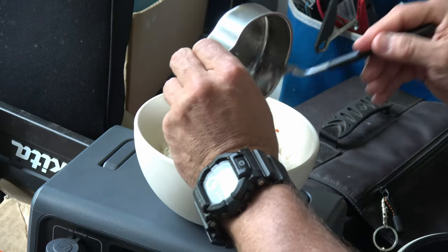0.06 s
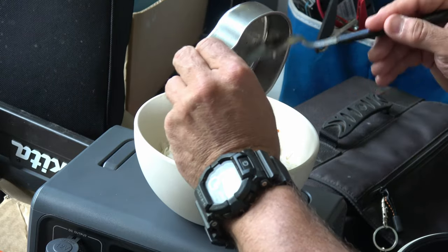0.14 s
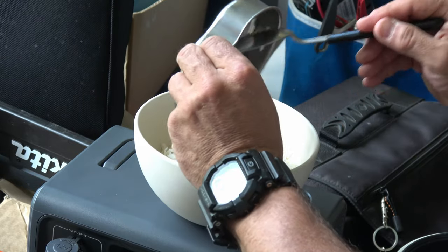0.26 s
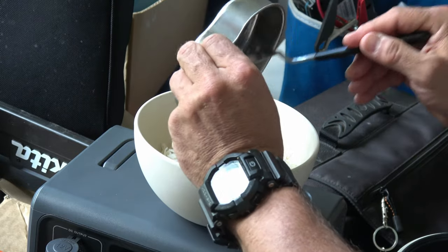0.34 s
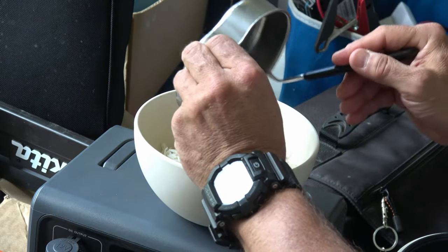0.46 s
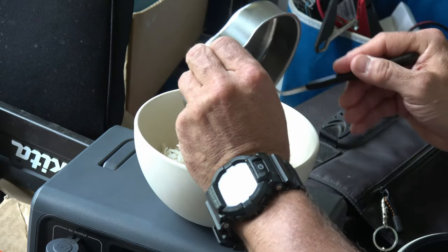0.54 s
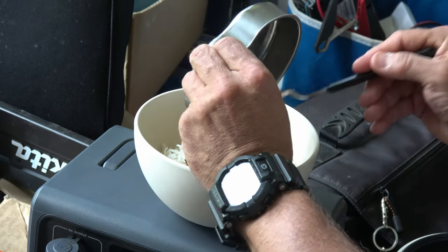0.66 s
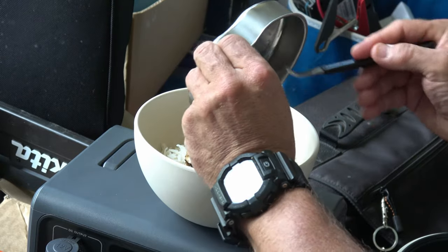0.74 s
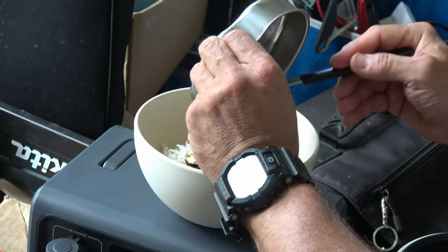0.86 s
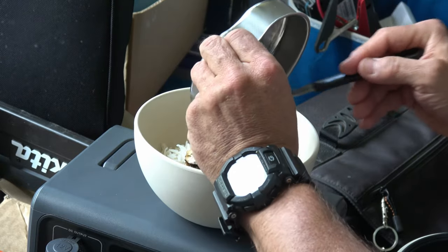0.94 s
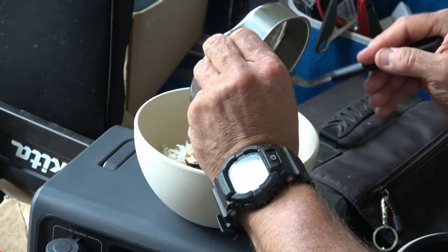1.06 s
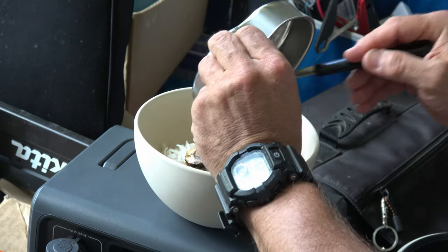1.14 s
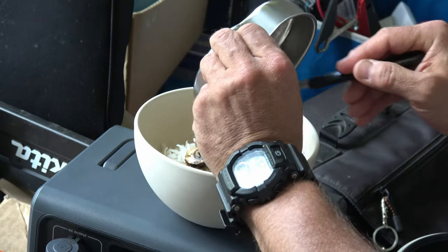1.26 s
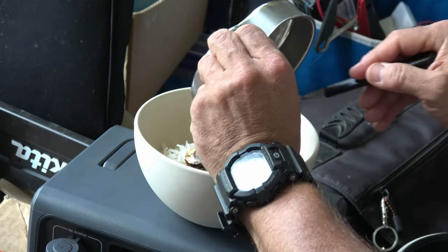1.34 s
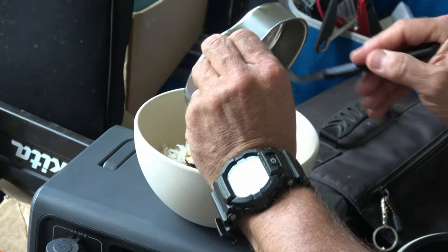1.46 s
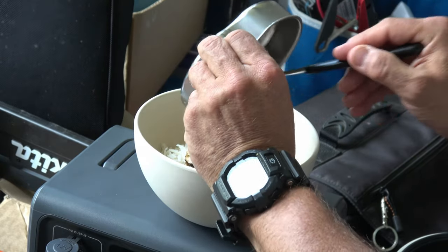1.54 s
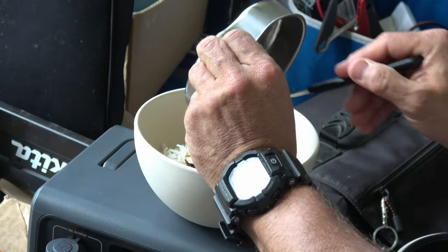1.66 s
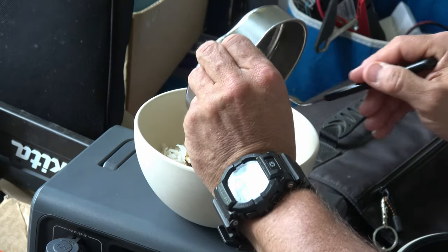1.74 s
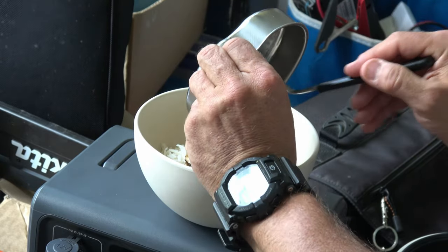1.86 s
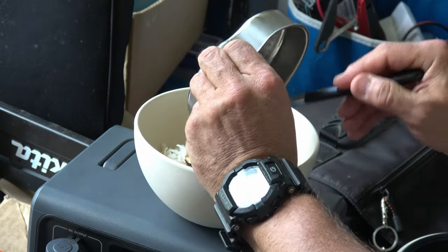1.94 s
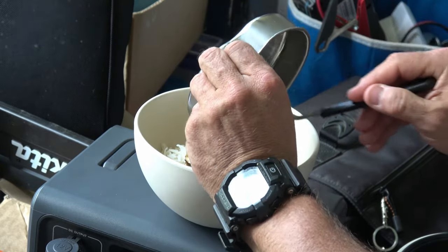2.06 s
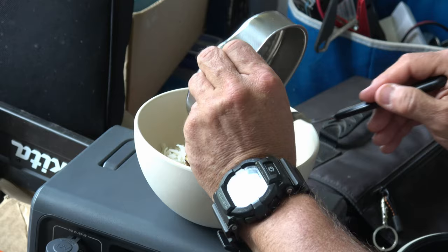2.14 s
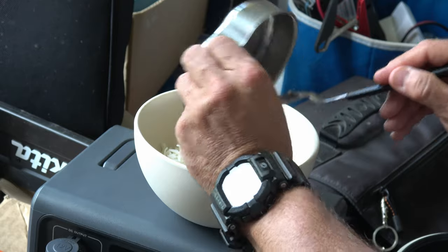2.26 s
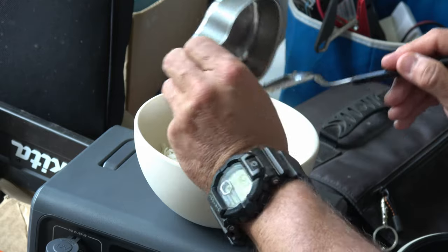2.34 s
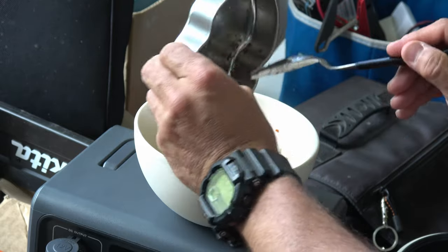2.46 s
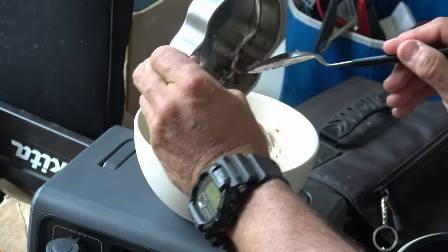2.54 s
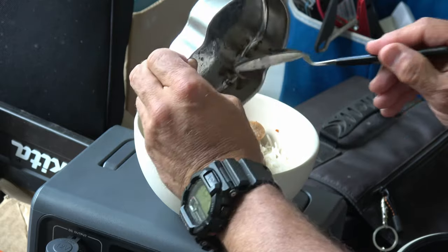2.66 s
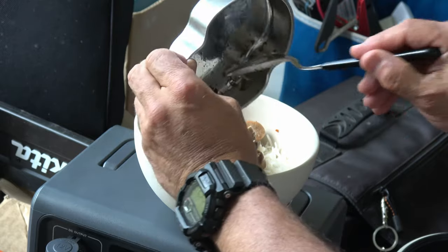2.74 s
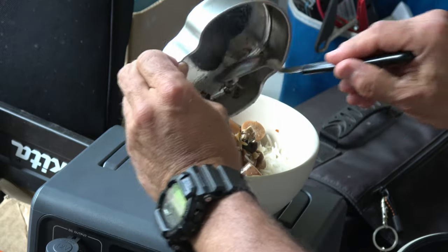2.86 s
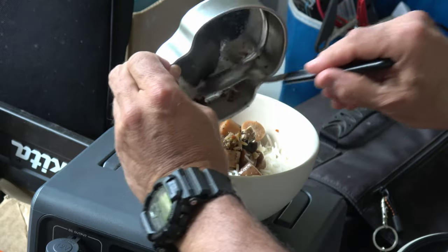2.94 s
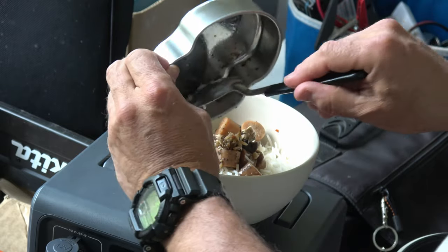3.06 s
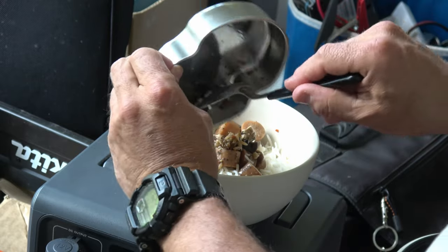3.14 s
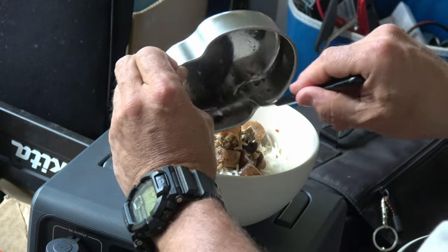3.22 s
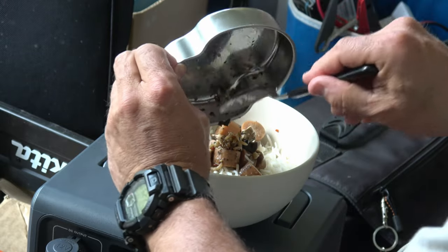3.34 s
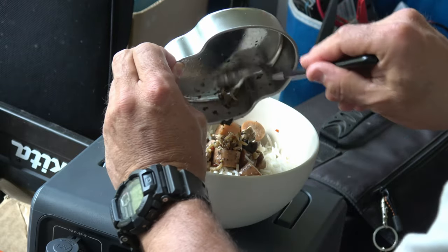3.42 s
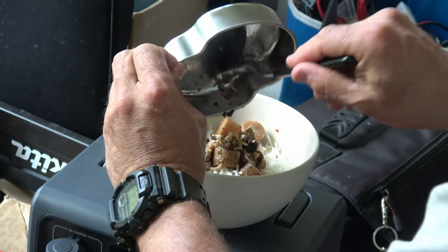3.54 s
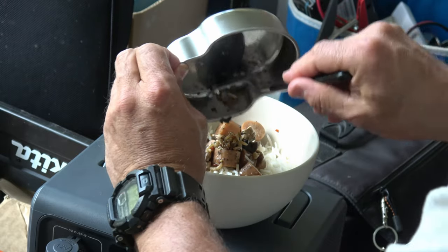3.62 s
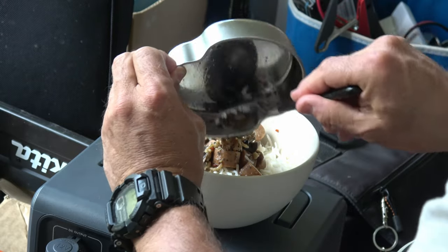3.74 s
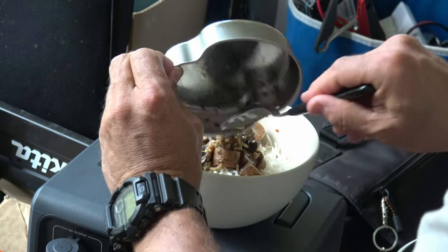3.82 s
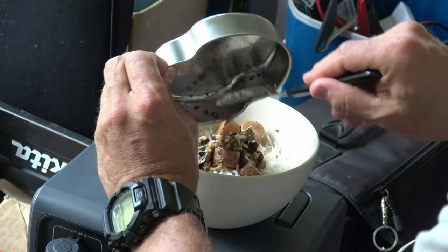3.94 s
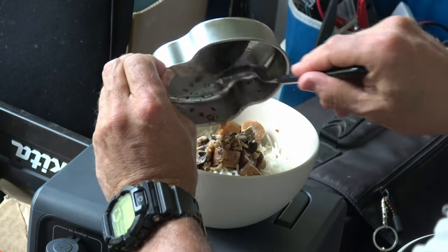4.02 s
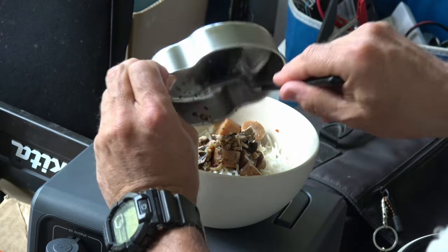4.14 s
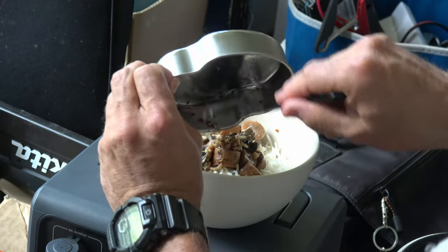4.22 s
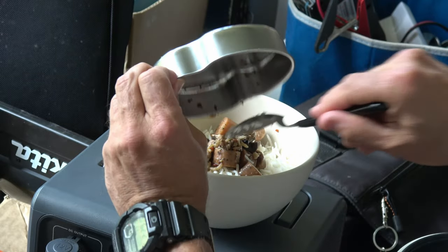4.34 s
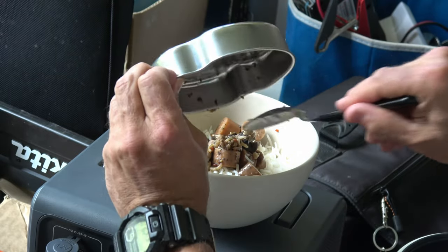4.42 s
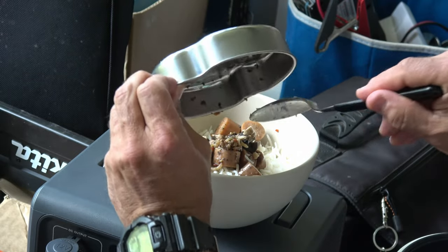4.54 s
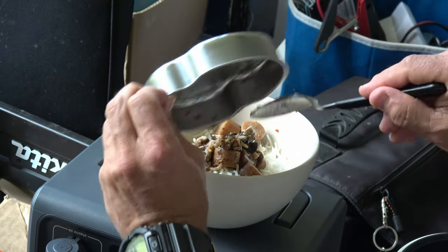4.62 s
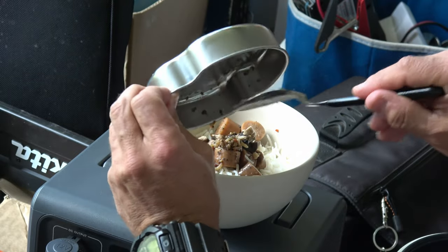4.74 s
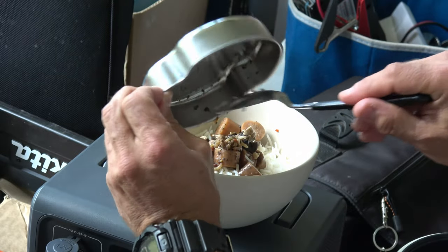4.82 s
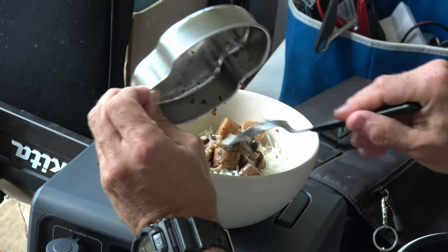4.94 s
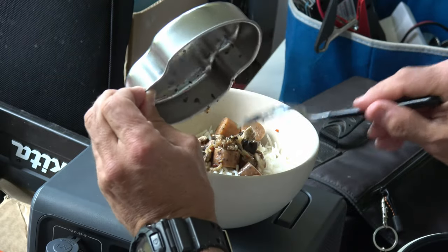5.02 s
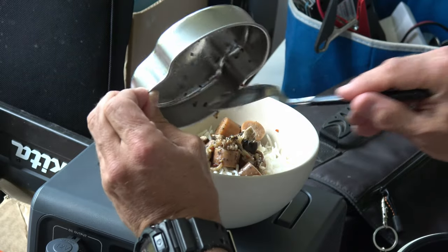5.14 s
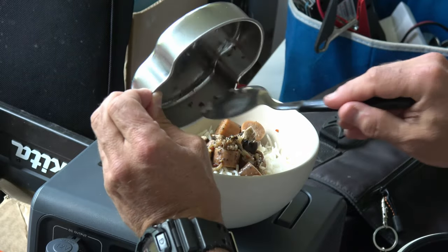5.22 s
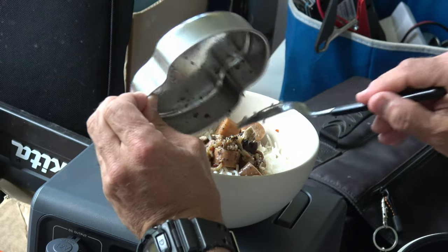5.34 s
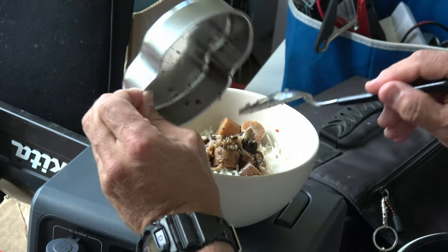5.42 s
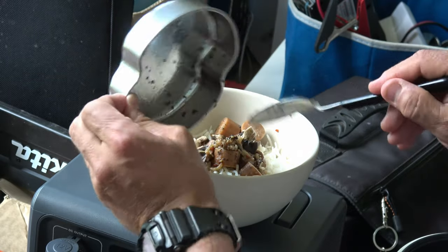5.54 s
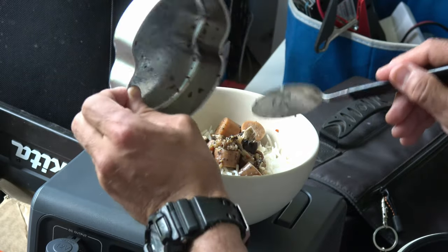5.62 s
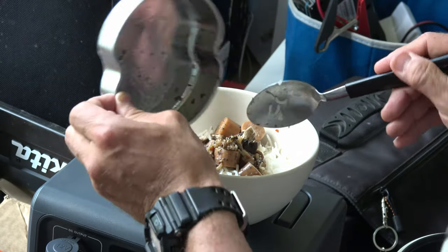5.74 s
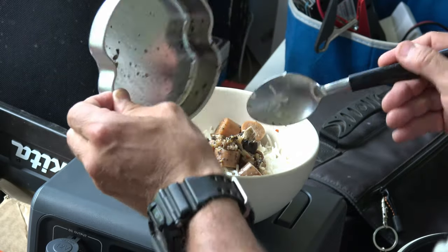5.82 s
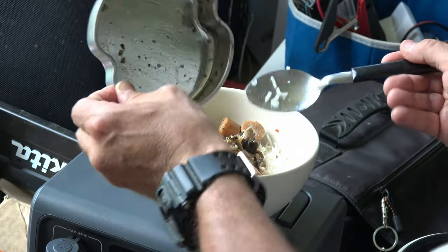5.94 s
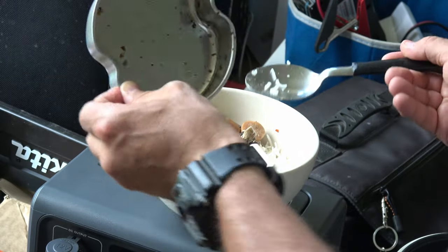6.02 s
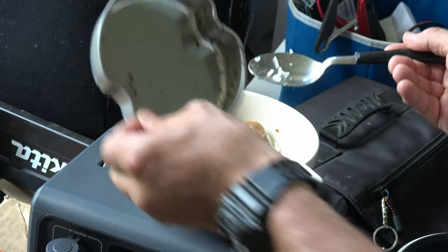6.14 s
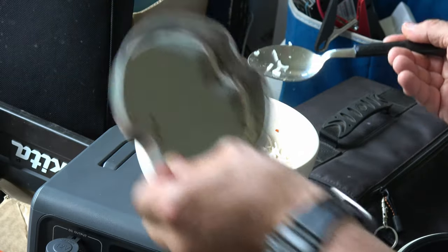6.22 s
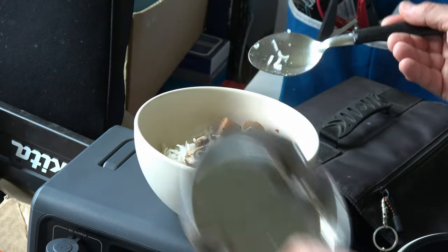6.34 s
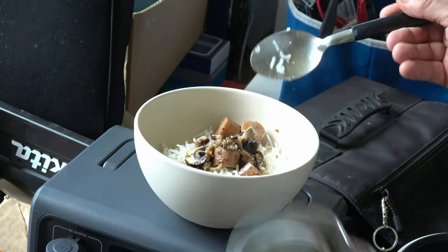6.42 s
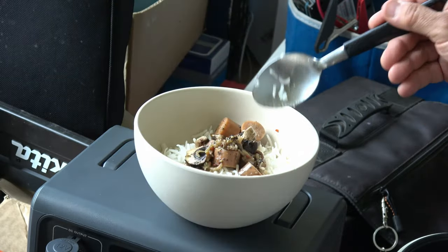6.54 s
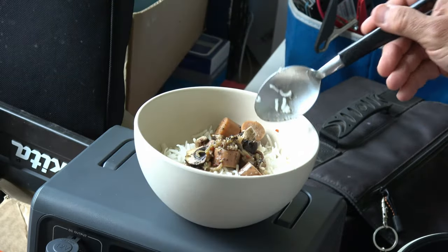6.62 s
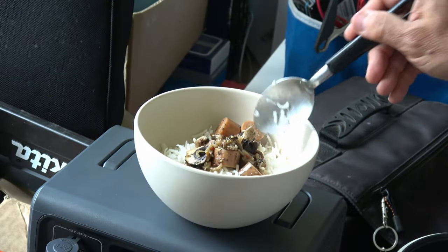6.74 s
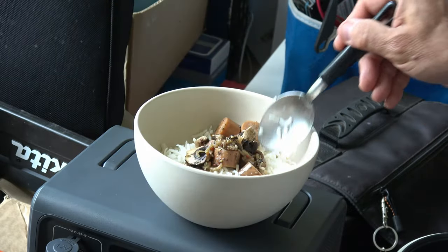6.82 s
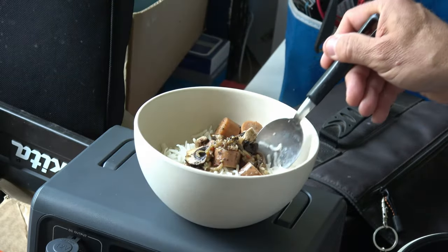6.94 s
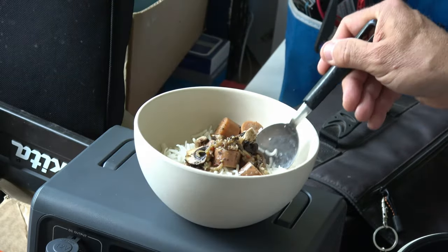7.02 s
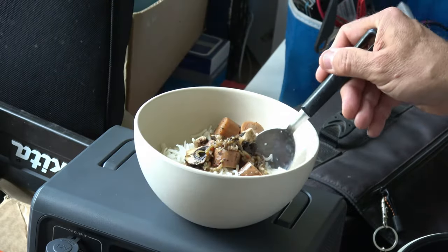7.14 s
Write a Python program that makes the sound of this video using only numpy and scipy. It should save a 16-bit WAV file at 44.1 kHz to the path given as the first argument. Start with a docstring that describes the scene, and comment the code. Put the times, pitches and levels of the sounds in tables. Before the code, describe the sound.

A spoon taps and scrapes a small steel tray over a ceramic bowl, with short metallic rings above a faint machine hum.

```python
"""A small room: close by, a spoon taps and scrapes clean a small steel tray held over a ceramic bowl.
Each contact rings the tray's modes by where it lands, and the bowl rings more slowly under it.
Scrapes drive the same modes with slip noise and add a rasp that rises with the spoon's speed.
The room answers briefly; behind it machines hum and throb faintly and a fan hisses."""
import sys
import numpy as np
from scipy import signal
from scipy.fft import rfft, irfft
from scipy.io import wavfile
from scipy.ndimage import uniform_filter1d

SR = 44100
rng = np.random.default_rng(int(sys.argv[2]) if len(sys.argv) > 2 else 0)


def put_to_file(sound):
    """Save the sound as 16-bit audio at rate SR, in the file named by the first command-line argument."""
    columns = np.atleast_2d(sound).T  # one column per channel
    safe = np.clip(columns, -1, 1)
    whole_steps = np.round(safe * 32767)
    wavfile.write(sys.argv[1], SR, whole_steps.astype(np.int16))


N = 316197
DULLING = 0.28  # share of the hardness tilt felt by strong modes and bowl


def amp(db):
    return 10 ** (np.asarray(db) / 20)


def unit_rms(x):
    return x / np.sqrt(np.mean(x ** 2) + 1e-20)


def curve_at(points, hz):
    f, value = np.transpose(points)
    return np.interp(np.log(hz + 1), np.log(f + 1), value)


def add(mix, start_s, sound):
    """Mix in a sound, panned to where the tray has drifted."""
    # tray drift: t/s, left minus right/dB
    sway = [(0, 1.6), (2.2, 0.4), (4.2, 0.05), (6.5, 1.4)]
    pan_db = np.interp(start_s, *np.transpose(sway))
    part = mix[:, round(start_s * SR):][:, :len(sound)]
    part += amp([[pan_db / 2], [-pan_db / 2]]) * sound[:part.shape[1]]


def damped_sines(hz, t60_s, size):
    t = np.arange(size) / SR
    return np.exp(-np.log(1000) * t / t60_s[:, None]) * np.sin(2 * np.pi * hz[:, None] * t)


def resonate(x, hz, width_hz):
    """Moving resonance: shift hz down to zero, smooth twice, shift back."""
    turn = np.exp(2j * np.pi * np.cumsum(hz) / SR)
    pole = np.exp(-np.pi * width_hz / SR)
    smoother = [1 - pole], [1, -pole]
    return 2 * (turn * signal.lfilter(*smoother, signal.lfilter(*smoother, x / turn))).real


def contact(main, main_db, second, second_db, *rest, spill_db=-24):
    """A contact stirs two places and spills into the others: five levels/dB, then rest."""
    # contact places: grip, rim, wall, floor, spoon's edge
    places = ["grip", "rim", "wall", "floor", "edge"]
    touched = {main: main_db, second: second_db}
    return [touched.get(name, main_db + spill_db) for name in places] + list(rest)


def tilt_db(contacts, hz):
    """Softer contacts lose treble above 2 kHz."""
    hardness = contacts[:, 7:8]
    return hardness * np.log2(np.maximum(hz, 2000) / 2000)


def tray_ring(contacts, weak_count=540):
    """Steel ring per contact: strong modes set by place, a dense sheet of weak ones by chance."""
    # strong modes: f/Hz
    mode_hz = [535, 895, 1373, 1405, 1440, 1535, 1760, 1990, 2045, 2143, 2557, 2725, 2775, 3030, 3456, 3805,
               4048, 4118, 4340, 4630, 4963, 5535, 5950, 6277, 6498, 6611, 7050, 7165, 7640, 8410]
    # same modes: level/dB at grip, rim, wall, floor, spoon's edge; t60/s
    modes = [(-2, -43, -36, -36, -39, 0.13), (-18.5, -28, -20, -10, -20.5, 0.14),
             (-17, -24, 2, -6.5, -20, 0.21), (-26.5, -4, -7, -33.5, -18.5, 0.14),
             (-19, -7, -26, -34, -18, 0.1), (-30, -9, -22.5, -42.5, -12.5, 0.13),
             (-12.5, -25, -22.5, -30.5, -12.5, 0.12), (-35.5, -23.5, 0.5, 4, -29.5, 0.099),
             (-23, -9.5, -18, -13, -35, 0.15), (-23, -25, -32.5, -2, -27, 0.097),
             (-23.5, -33, -17.5, -31.5, 1.5, 0.22), (-32.5, -31, -12.5, -3.5, -4, 0.08),
             (-25, -11.5, -27, -16.5, -11, 0.11), (-21.5, -22.5, -32.5, -10, -12.5, 0.34),
             (-38.5, -29.5, -34, -35, -9, 0.089), (-35.5, -22, -28, -5.5, -9.5, 0.22),
             (-29.5, -17.5, -32, -21, 3, 0.15), (-41, -21.5, -19.5, -29, -13, 0.15),
             (-32, -33.5, -37, -30, -6.5, 0.045), (-39, -29, -26.5, -23.5, -8.5, 0.088),
             (-34.5, -21, -25.5, -21.5, -9, 0.53), (-30, -29.5, -34.5, -34.5, -3, 0.38),
             (-34, -7, -24.5, -16.5, 6, 0.11), (-23, -33, -36, -24, -7, 0.16),
             (-36.5, -34, -42.5, -36.5, 2.5, 0.29), (-27.5, -35.5, -37.5, -26, -6, 0.12),
             (-34.5, -20, -32.5, -13, -7, 0.36), (-32.5, -28, -11.5, -24, -3, 0.16),
             (-36, -21, -34.5, -13, -2.5, 0.2), (-34, -27.5, -18.5, -13.5, -7.5, 0.14)]
    # weak modes of the thin steel: f/Hz, level/dB
    sheet_db = [(300, -26), (700, -9.5), (1200, -6.5), (2000, -2), (3500, -3), (6000, -4.5), (10000, -1),
                (14000, -0.5), (16500, -25)]
    # their decay: f/Hz, t60/s
    sheet_t60 = [(400, 0.17), (2000, 0.077), (6000, 0.17), (15000, 0.047)]
    modes, mode_hz = np.array(modes), np.array(mode_hz)
    strong = amp(contacts[:, :5]) @ amp(modes[:, :5]).T
    scatter_db = 4 * rng.standard_normal(strong.shape)
    strong *= amp(DULLING * tilt_db(contacts, mode_hz) + scatter_db)
    for favoured_hz, db in contacts[:, -4:].T.reshape(2, 2, -1):  # two modes set by the exact spot
        nearest = abs(favoured_hz[:, None] - mode_hz).argmin(1)
        strong[np.arange(len(contacts)), nearest] = amp(db)
    strong *= rng.choice([-1., 1.], strong.shape)
    steel = strong @ damped_sines(mode_hz, modes[:, 5], SR // 2)
    weak_hz = np.linspace(300, 16500, weak_count) + rng.uniform(-10.5, 10, weak_count)
    weak_db = contacts[:, 6:7] + curve_at(sheet_db, weak_hz) + tilt_db(contacts, weak_hz)
    weak = amp(weak_db) * rng.standard_normal(weak_db.shape)
    steel[:, :SR // 4] += weak @ damped_sines(weak_hz, curve_at(sheet_t60, weak_hz), SR // 4)
    return steel


def bowl_ring(contacts):
    """Slow ceramic ring per contact."""
    # bowl modes: f/Hz, t60/s, level/dB
    modes = [(745, .4, -24), (1071, .9, -19), (1152, .45, 0), (2409, .33, -16), (3219, .6, -26),
             (4544, .34, -24), (5163, .55, -20)]
    hz, t60_s, db = np.transpose(modes)
    gains = amp(contacts[:, 5:6] + db + DULLING * tilt_db(contacts, hz))
    return gains @ damped_sines(hz, t60_s, SR // 2)


def taps(chatter_db=-20.5, chatter_s=0.021, grip_db_per_s=32.5):
    """A click, then chatter as the spoon settles; hand and spoon damp the steel. Gives tray, bowl."""
    # spoon blows: t/s, main place, level/dB, second place, level/dB, bowl/dB, weak modes/dB,
    # hardness/(dB/oct), two favoured modes (f/Hz, level/dB)
    blows = [(0, "floor", -47.5, "wall", -40.5, -61.5, -54.5, 0.1, 1373, -43.5, 2725, -37.5),
             (.2185, "edge", -42.5, "rim", -37.5, -46, -40.5, -3, 1373, -58, 7050, -32.5),
             (.427, "rim", -23, "wall", -22.5, -35.5, -37.5, -3, 1440, -14, 4118, -26.5),
             (0.612, "floor", -38.5, "wall", -69, -74, -48, -6, 1990, -34, 2725, -26.5),
             (0.8305, "edge", -54, "rim", -26.5, -36.5, -38, -3.5, 1990, -28, 5950, -24),
             (0.9145, "wall", -27, "rim", -49, -32.5, -35.5, -8.5, 1373, -26, 2557, -39),
             (1.055, "rim", -27, "wall", -47, -37.5, -32.5, -5, 1373, -25.5, 2775, -20),
             (1.2461, "wall", -29.5, "grip", -36, -45, -43, -4, 1990, -24.5, 8410, -33.5),
             (1.593, "edge", -68, "grip", -61, -52, -57.5, -4, 1990, -54, 4963, -54),
             (1.6869, "floor", -24, "wall", -32, -57, -39, -5.5, 1990, -23, 2557, -35),
             (1.762, "edge", -41, "wall", -41, -36.5, -54, -2, 2725, -35, 5950, -26),
             (2.0207, "floor", -32.5, "wall", -46, -38.5, -44.5, -2, 1373, -34.5, 8410, -35),
             (2.483, "grip", -65, "floor", -75, -59.5, -81, -24, 3030, -65, 1990, -69),
             (2.9966, "rim", -29, "grip", -37, -41.5, -44.5, -1.2, 1760, -32.5, 4048, -35),
             (3.083, "floor", -47, "grip", -45, -34.5, -38.5, -5.5, 1990, -29, 5950, -30),
             (3.5208, "grip", -39, "floor", -59, -41.5, -51.5, -20.5, 1373, -44, 2557, -50),
             (3.6146, "rim", -20, "floor", -24.5, -19.5, -39, -3.5, 1990, -16.5, 1440, -16.5),
             (4.1549, "rim", -15.5, "wall", -27, -24.5, -41.5, -1.7, 1990, -16, 4048, -25),
             (5.2297, "edge", -28, "wall", -34, -26.5, -34.5, -0.8, 2725, -27, 4340, -16),
             (5.67, "grip", -53, "wall", -71, -58, -74, -7, 535, -49, 1990, -59),
             (6.034, "grip", -60, "wall", -77, -71, -80, -6, 535, -51.5, 895, -71.5),
             (6.442, "grip", -60, "floor", -83, -67, -75.5, -4.5, 535, -70, 1990, -70.5)]
    contacts = np.array([contact(*row[1:]) for row in blows])
    tray, bowl = np.zeros((2, N)), np.zeros((2, N))
    t = np.arange(2500) / SR
    for (start_s, *_), steel, ceramic in zip(blows, tray_ring(contacts), bowl_ring(contacts)):
        chatter = rng.standard_normal(len(t)) * (rng.random(len(t)) < .1)
        force = amp(chatter_db) * chatter * np.exp(-t / chatter_s)
        force[0] = 1
        damping = amp(-grip_db_per_s * np.arange(len(steel)) / SR)
        add(tray, start_s, signal.fftconvolve(force, steel * damping))
        add(bowl, start_s, ceramic)  # one clean ceramic ring starts with each tap
    return tray, bowl


def machine_hum(crest_s=3.62, waver_db=0.4, rumble_db=-77):
    """Wavering lines, in phase at crest_s, over a low rumble; the close pair beats."""
    # hum lines: f/Hz, level/dB
    lines = [(29.82, -70), (59.6, -67), (67.56, -64), (87.21, -61.5), (89.48, -63.5), (119.27, -82.5)]
    t = np.arange(N) / SR - crest_s
    out = np.zeros(N)
    for hz, db in lines:
        waver = unit_rms(sum(np.sin(2 * np.pi * (f * t + rng.random())) for f in (.2, .45, .9)))
        out += np.sqrt(2) * amp(db + waver_db * waver) * np.cos(2 * np.pi * hz * t)
    band = signal.butter(2, [20, 90], "band", fs=SR, output="sos")
    rumble = signal.sosfilt(band, rng.standard_normal(N))
    return out + amp(rumble_db) * unit_rms(rumble)


def fan_noise(level_db=-58, patch_db=1.7):
    """Fan and microphone noise with faint drifting patches in its spectrum."""
    # noise spectrum: f/Hz, relative density/dB
    spectrum = [(59, -32), (100, 3), (119, -11), (186, -12.5), (255, -16), (303, -12), (359, -17),
                (527, -13.5), (612, -15.5), (879, -18), (1180, -7.5), (1290, -24), (12100, -33.5),
                (16300, -39)]
    # stereo likeness: f/Hz, coherence
    coherence = [(60, 0.74), (180, 0.77), (550, 0.56), (1650, 0.98), (4970, 0.61), (15000, 0.91)]
    frames, hz = N // 256 + 5, np.fft.rfftfreq(1024, 1 / SR)
    left_re, left_im, side_re, side_im, patches = rng.standard_normal((frames, 513, 5)).T
    patches = unit_rms(uniform_filter1d(uniform_filter1d(patches, 8, 0), 14, 1))
    shared = curve_at(coherence, hz)[:, None]
    left = left_re + 1j * left_im
    right = shared * left + np.sqrt(1 - shared ** 2) * (side_re + 1j * side_im)
    spectra = np.array([left, right]) * amp(curve_at(spectrum, hz)[:, None] + patch_db * patches)
    noise = signal.istft(spectra, nperseg=1024, noverlap=768)[1][:, :N]
    return amp(level_db) * unit_rms(noise)


def thud(db, hz, t60_s, attack_s=0.0018):
    """One low damped mode with a soft start."""
    t = np.arange(SR // 3) / SR
    return amp(db - 60 * t / t60_s) * np.sin(2 * np.pi * hz * t) * (1 - np.exp(-t / attack_s))


def machine_throb(period_s=.3012, level_db=-60, hz=294):
    """Regular beat of a distant machine, uneven in strength."""
    out = np.zeros((2, N))
    for start_s in np.arange(.02, N / SR, period_s):
        db = level_db + 4.8 * rng.standard_normal()
        add(out, start_s, thud(db, hz * rng.uniform(1.0, 1.04), t60_s=.2))
    return out


def scrapes(lift_db_per_s=699.5, lift_s=0.028, grit_per_s=2500, screech_hz=7480):
    """Slips and grit drive the modes, a rasp and an edge screech; the spoon speeds up, then lifts."""
    # spoon strokes: t/s, length/s, top level/dB, swell/dB, main place, second place;
    # relative to main place: second/dB, bowl/dB, weak modes/dB; hardness/(dB/oct),
    # two favoured modes (f/Hz, level/dB), rasp top/Hz, rasp/dB, screech/dB
    strokes = [(0.294, 0.11, -43, 8, "rim", "edge", -15, -18, -16, 1.2, 4048, -7, 5535, 0, 5200, -3, -5),
               (.47, 0.057, -33.5, -1, "wall", "rim", -9, 18, -17, -3, 1535, 12, 3030, 3, 3050, -1.5, -23),
               (0.626, 0.0533, -31, 27, "floor", "wall", -22, -6, -21, 2, 1990, 3.5, 8410, 1, 4170, -9.5, -10.5),
               (0.937, 0.12, -26, 8.5, "floor", "wall", -13, -9, -17, 2, 1990, 0, 7165, 3, 7860, -14, -1.5),
               (1.283, 0.12, -25.5, 13, "floor", "wall", -3.5, 2, -15, 0.8, 2143, 5, 4048, 2.5, 4250, -6, -2.5),
               (1.74, 0.045, -31, 16, "floor", "edge", 1, 25, -5, -.9, 5950, 3, 4630, 1.5, 5200, -4, -1),
               (2.05, 0.085, -25, 9, "floor", "wall", -16.5, -21, -11.5, -3, 1990, 1.5, 3805, 3.5, 3800, -8, -5.5),
               (3.79, 0.084, -28, 17.5, "edge", "floor", -0.5, 7.5, -15, -5.5, 4630, 0, 4963, 3.5, 3700, -1.5, -10.5),
               (4.239, 0.083, -25, 14, "rim", "floor", -3.5, -8.5, -9, -4.5, 1405, 3, 1990, 0, 3850, -5, -4),
               (5.233, 0.064, -31.5, -1.2, "edge", "floor", -2, -30.5, 1, -6.5, 6498, 4, 6277, 6, 4400, -4, -0.5)]
    contacts = np.array([contact(row[4], 0, *row[5:-3]) for row in strokes])
    out, size = np.zeros((2, N)), SR // 4
    t = np.arange(size) / SR
    lowpass = signal.butter(2, 3000, fs=SR, output="sos")
    for row, steel, ceramic in zip(strokes, tray_ring(contacts), bowl_ring(contacts)):
        start_s, length_s, top_db, swell_db = row[:4]
        rasp_hz, rasp_db, screech_db = row[-3:]
        speed = np.minimum(t / length_s, 1)
        envelope_db = -swell_db * (1 - speed) ** 2.6 - lift_db_per_s * np.maximum(t - length_s, 0)
        level = amp(top_db + envelope_db) * (t < length_s + lift_s)
        grit = amp(7.8 * np.minimum(rng.exponential(1, size), 3.2))
        grit *= rng.random(size) < grit_per_s / SR
        slips = unit_rms((1 + grit) * rng.standard_normal(size))
        blunt = signal.sosfilt(lowpass, slips)
        force = blunt + (slips - blunt) * amp(0.72 * envelope_db)  # louder is sharper
        spoon_damping = np.exp(-np.arange(len(steel)) / SR / 0.046)
        ring = steel * spoon_damping + 0.2 * ceramic
        rasp = unit_rms(resonate(slips, rasp_hz * (0.65 + 0.35 * speed), width_hz=900))
        screech = unit_rms(resonate(slips, np.full(size, screech_hz), width_hz=2400))
        add(out, start_s, signal.fftconvolve(force * level, ring / np.linalg.norm(ring)))
        add(out, start_s, level * speed * (amp(rasp_db) * rasp + amp(screech_db) * screech))
    return out


def knocks():
    """Dull thumps, most of them under a hard tap."""
    # low knocks: t/s, level/dB, f/Hz
    thumps = [(.425, -46, 245), (0.662, -44, 167), (0.913, -42, 307), (1.248, -42.5, 349),
              (2.996, -48, 270), (3.149, -43, 192), (3.518, -49.5, 238), (3.616, -44.5, 234),
              (5.225, -43, 234), (6.316, -44.5, 193)]
    out = np.zeros((2, N))
    for start_s, db, hz in thumps:
        add(out, start_s, thud(db, hz, t60_s=0.1))
    return out


def room(x, tail_db=-4.5):
    """Direct sound, early echoes and a tail of sparse reflections dying band by band."""
    # tail decay: f/Hz, t60/s
    decay = [(250, 0.57), (1000, 0.34), (4000, 0.38), (12000, 0.33)]
    # stereo likeness of the tail: f/Hz, coherence
    coherence = [(250, 0.57), (600, 1), (2000, 0.99), (4000, 1), (10000, 0.4)]
    # early reflections: left t/s, right t/s, level/dB
    echoes = [(.0021, .00215, -20), (.0058, .0057, -35.5), (.0093, 0.0077, -21), (0.0132, .0149, -21),
              (0.022, 0.017, -24)]
    reflections = np.zeros((2, SR // 2))
    slots = np.arange(400, SR // 2 - 20, 20)
    arrivals = slots + rng.integers(0, 20, (2, len(slots)))
    np.put_along_axis(reflections, arrivals, rng.choice([-1., 1.], arrivals.shape), 1)
    hz, t, spectra = signal.stft(reflections, SR, nperseg=256)
    shared = curve_at(coherence, hz)[:, None]
    spectra[1] = shared * spectra[0] + np.sqrt(1 - shared ** 2) * spectra[1]
    spectra *= amp(-60 * t / curve_at(decay, hz)[:, None])
    response = signal.istft(spectra, SR, nperseg=256)[1]
    response *= amp(tail_db) / np.linalg.norm(response[0])
    response[:, 0] += 1
    for left_s, right_s, db in echoes:
        response[[0, 1], [round(left_s * SR), round(right_s * SR)]] += amp(db)
    return signal.fftconvolve(x, response, axes=1)[:, :N]


def scene():
    """Contacts and throb pass through the room; the tapped bowl outlasts it and stays dry."""
    highpass = signal.butter(2, 350, "high", fs=SR, output="sos")  # a small tray radiates little bass
    steel, bowl = taps()
    tray = signal.sosfilt(highpass, steel + scrapes())
    return room(tray + machine_throb() + knocks()) + bowl + machine_hum() + fan_noise()


def record(dry, ceiling=.6, cutoff_hz=16300):
    """Two microphones of unequal colour, rounded peaks, band limit."""
    # microphone balance: f/Hz, left minus right/dB
    balance = [(60, -0.5), (180, 0), (550, 3), (1650, -4), (4970, -1), (15000, 0.5)]
    balance_db = curve_at(balance, np.fft.rfftfreq(N, 1 / SR))
    coloured = irfft(rfft(dry) * amp([balance_db / 2, -balance_db / 2]), N)
    rounded = ceiling * np.tanh(coloured / ceiling)
    lowpass = signal.firwin(511, cutoff_hz, window=("kaiser", 9), fs=SR)
    return signal.oaconvolve(rounded, lowpass[None], "same")


dry = scene()
out = record(dry)
put_to_file(out)
```